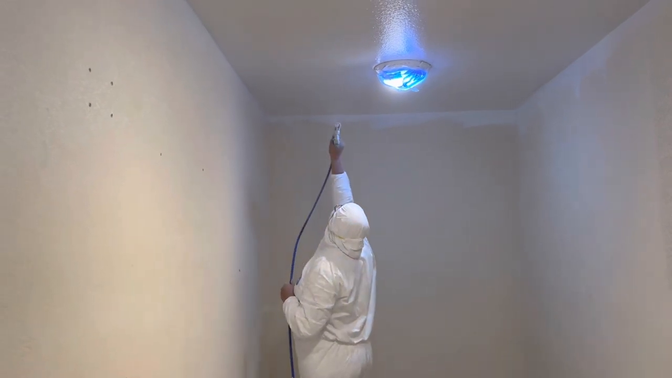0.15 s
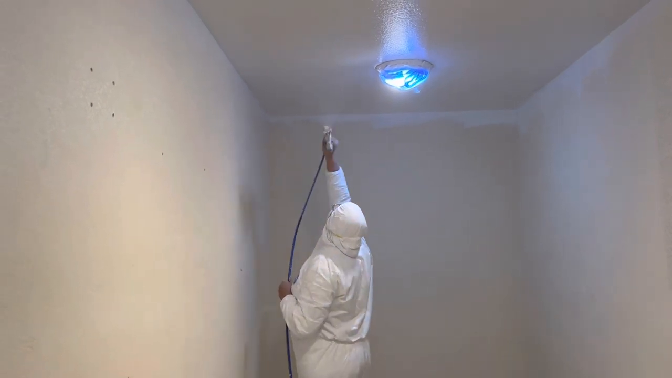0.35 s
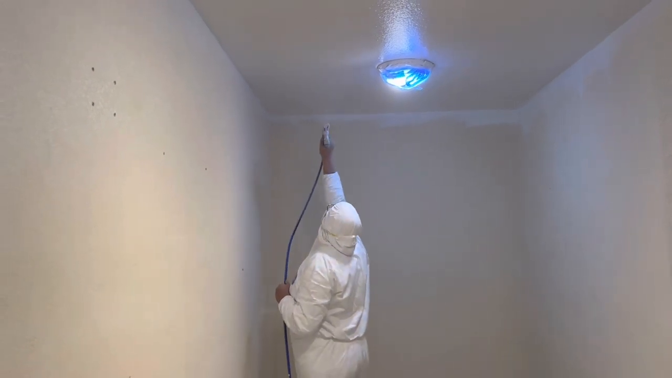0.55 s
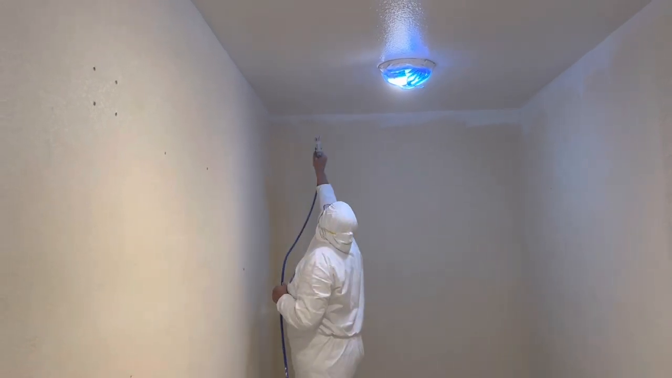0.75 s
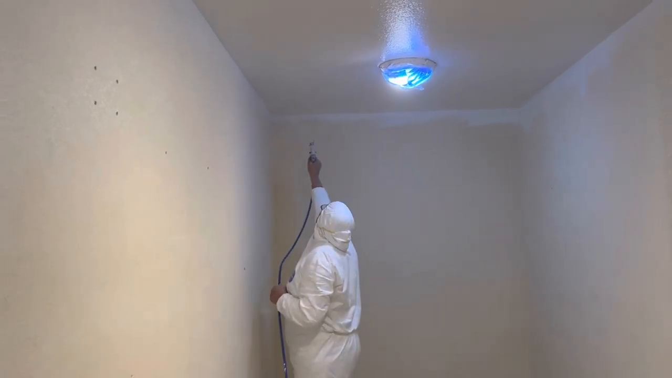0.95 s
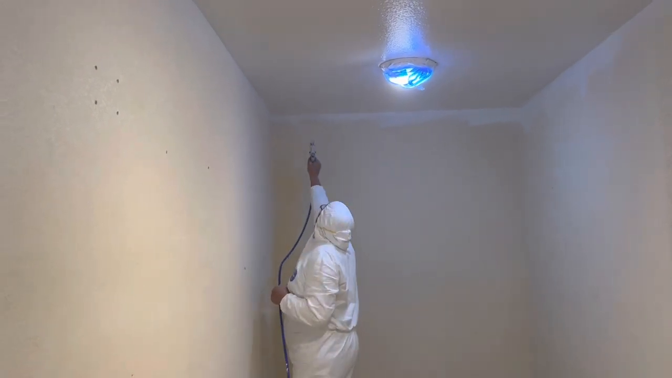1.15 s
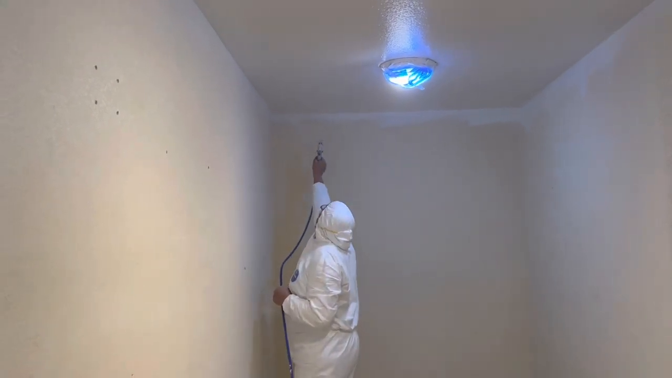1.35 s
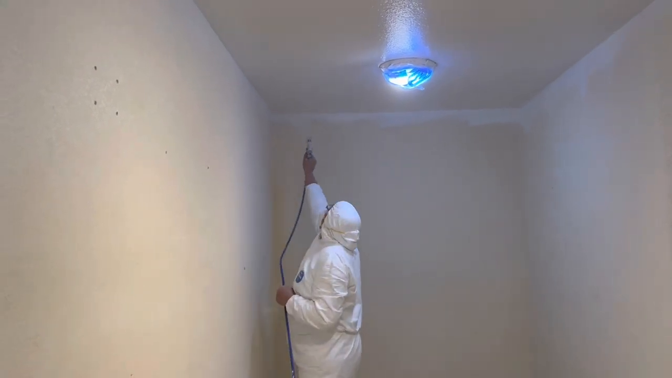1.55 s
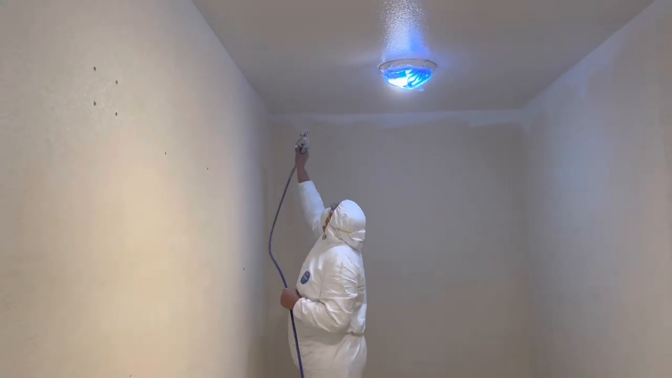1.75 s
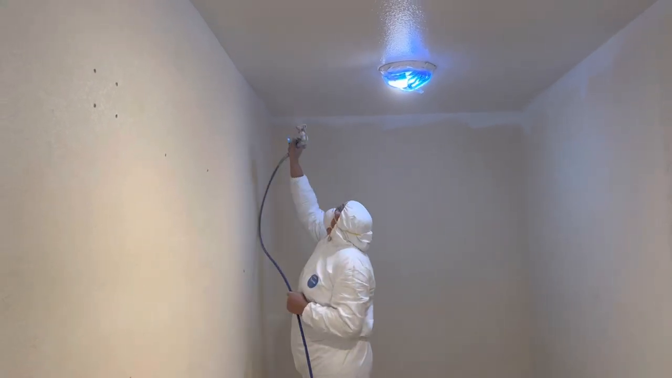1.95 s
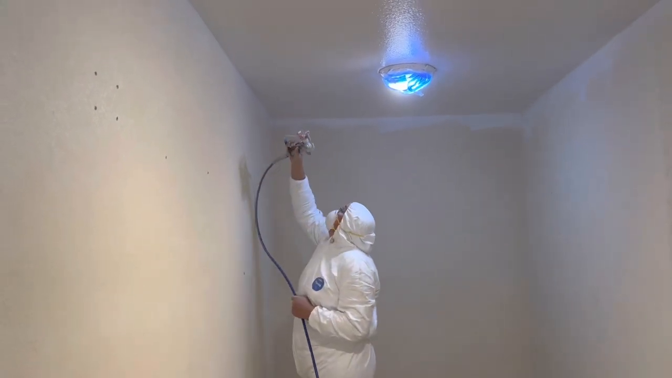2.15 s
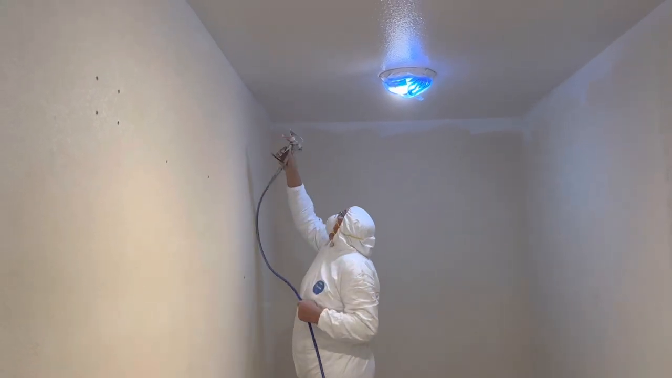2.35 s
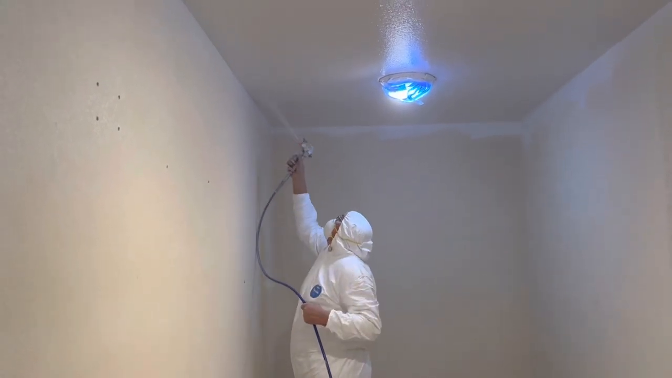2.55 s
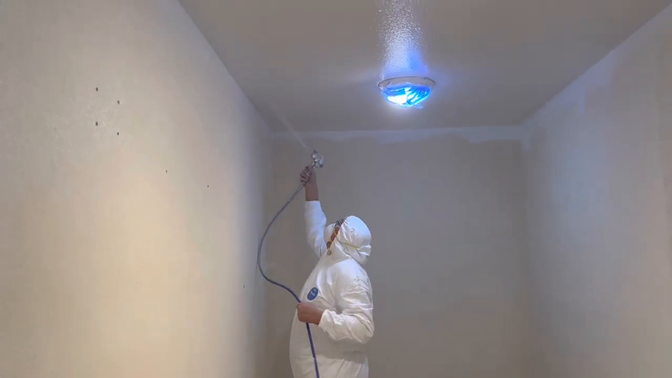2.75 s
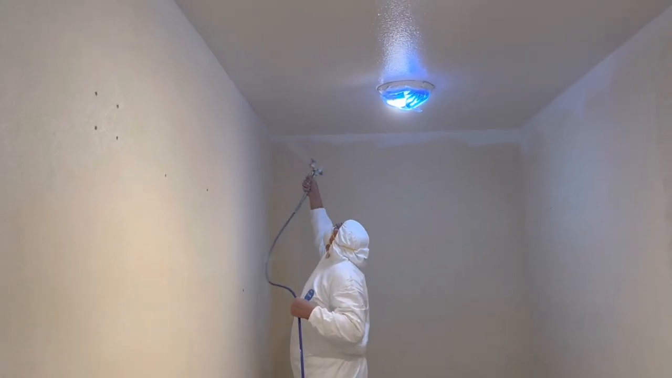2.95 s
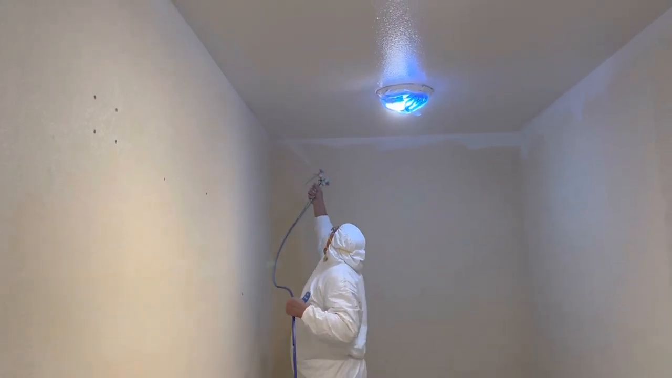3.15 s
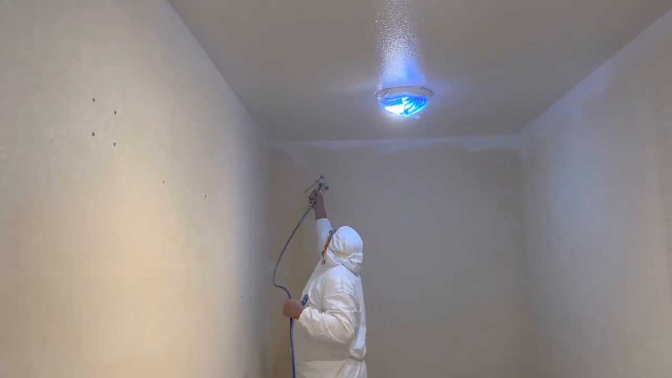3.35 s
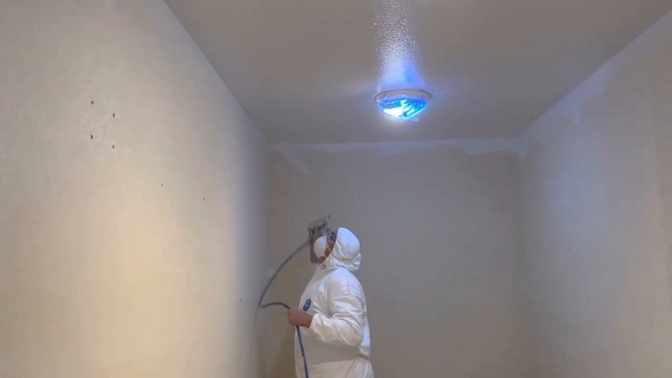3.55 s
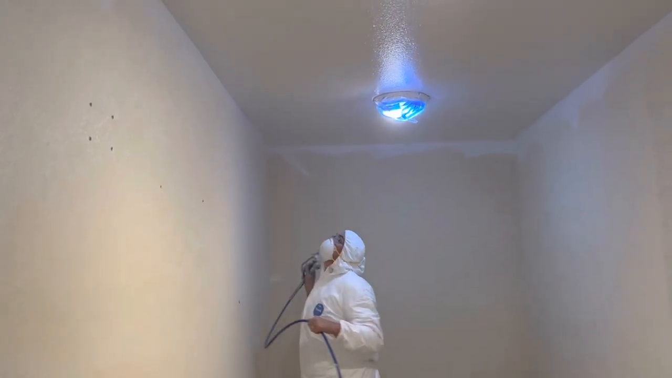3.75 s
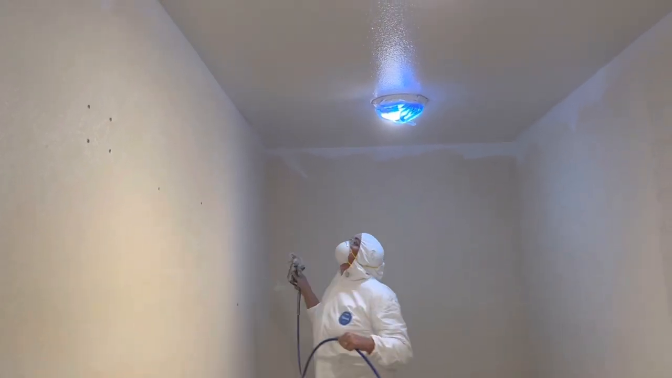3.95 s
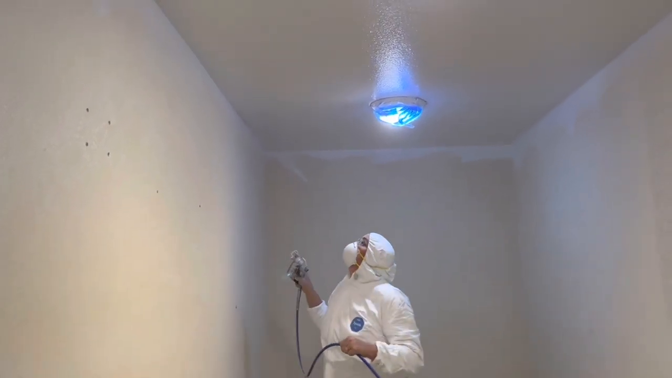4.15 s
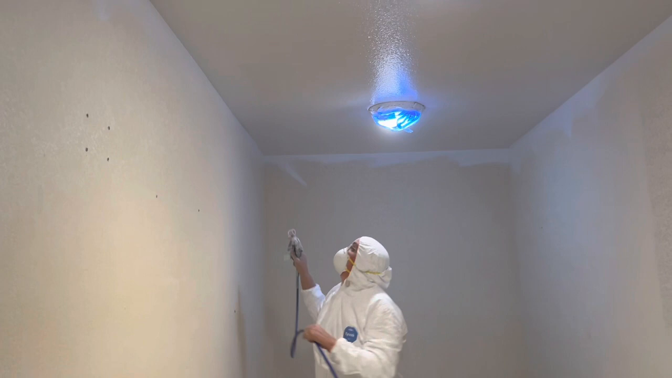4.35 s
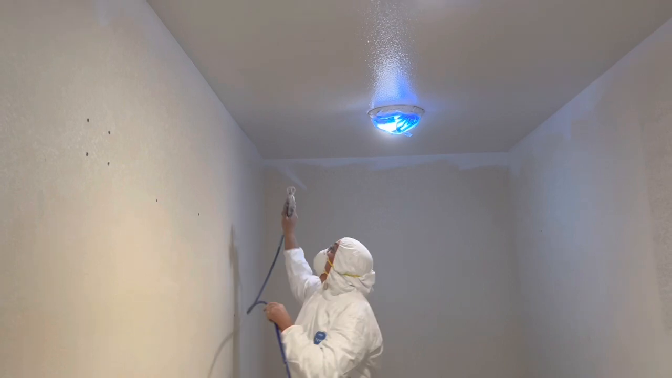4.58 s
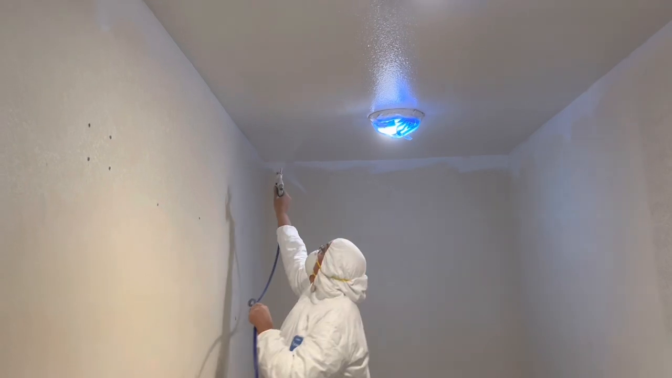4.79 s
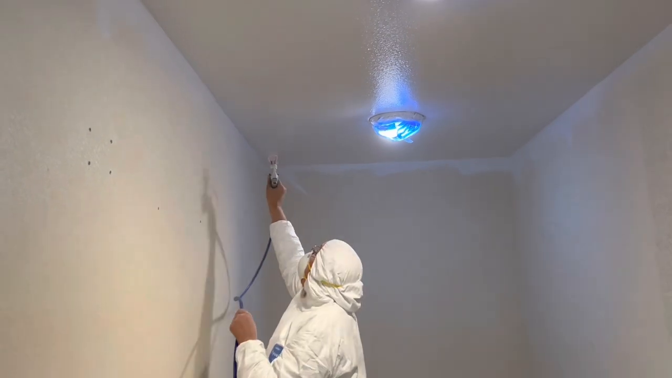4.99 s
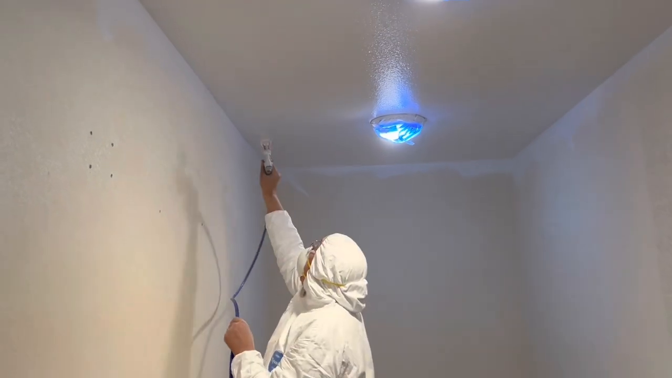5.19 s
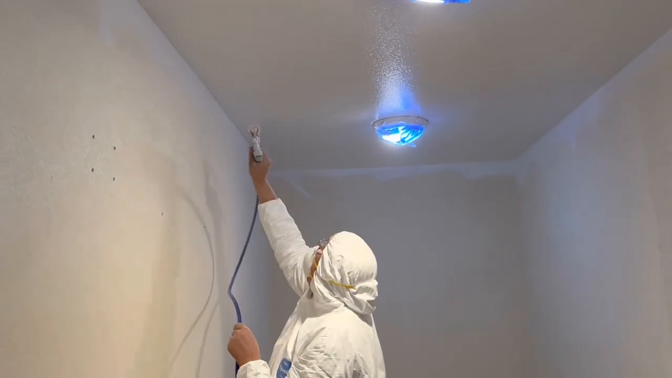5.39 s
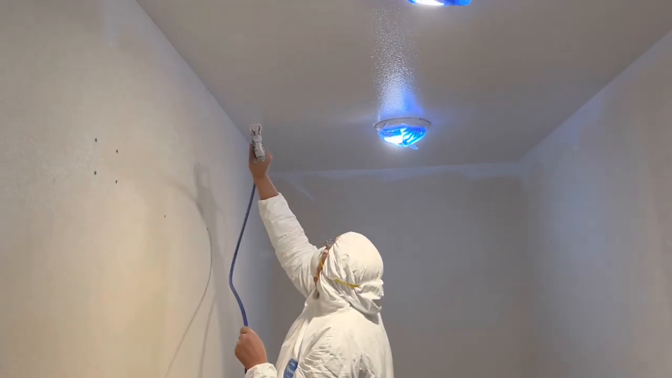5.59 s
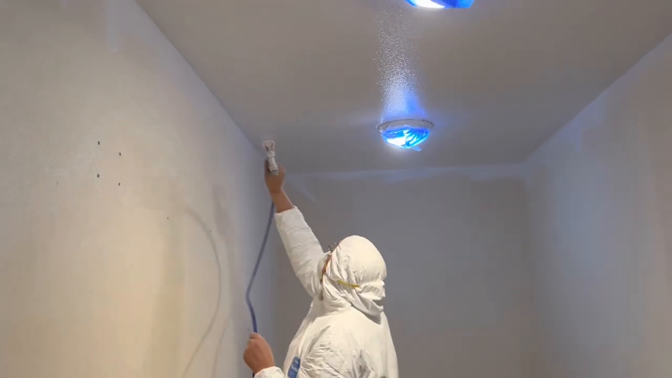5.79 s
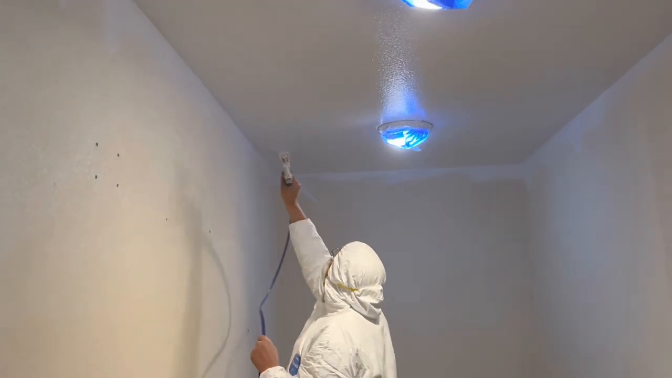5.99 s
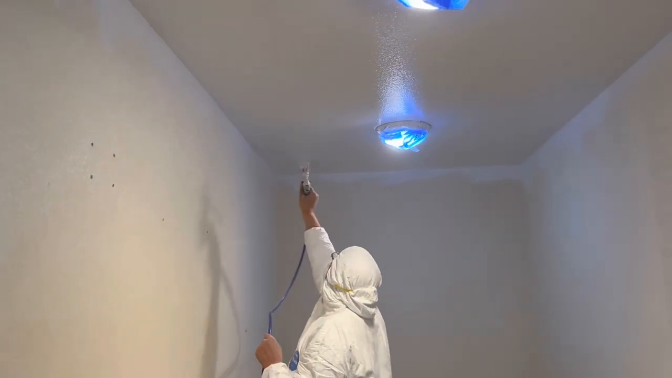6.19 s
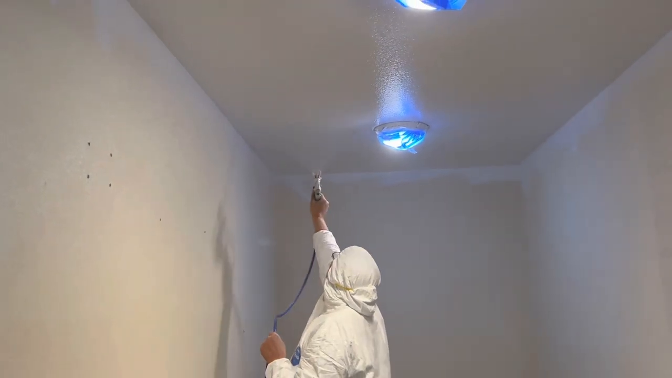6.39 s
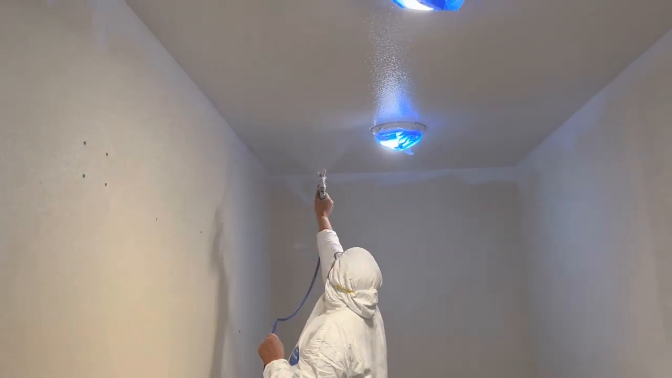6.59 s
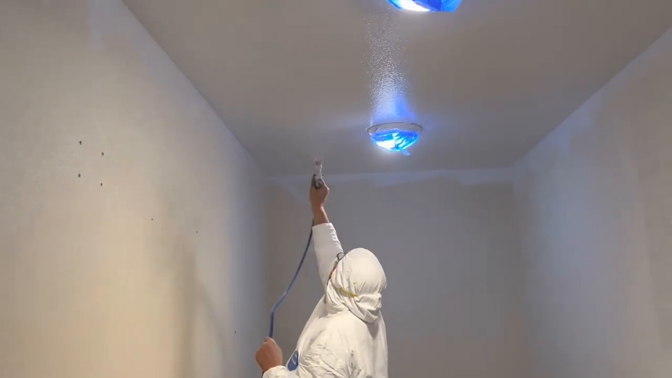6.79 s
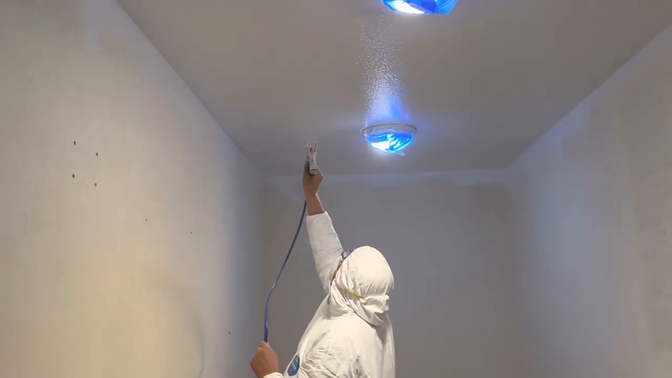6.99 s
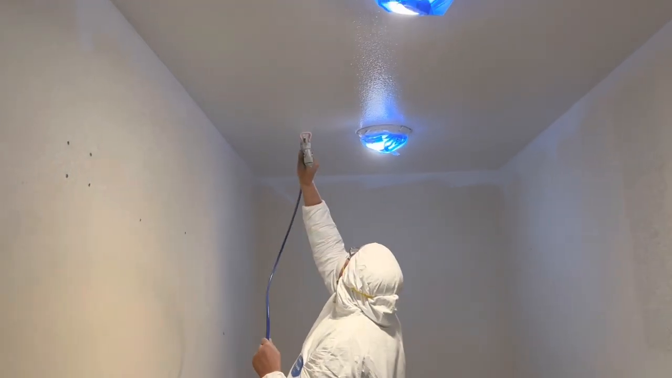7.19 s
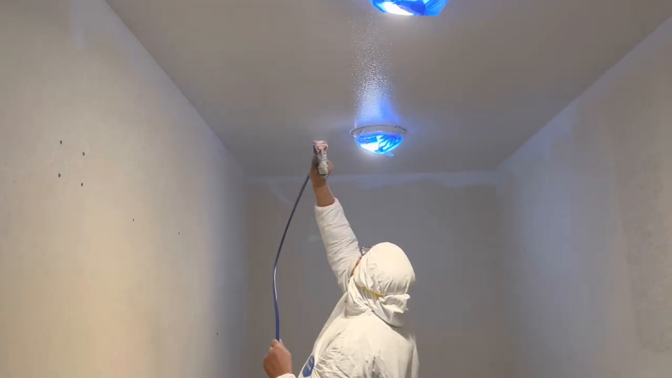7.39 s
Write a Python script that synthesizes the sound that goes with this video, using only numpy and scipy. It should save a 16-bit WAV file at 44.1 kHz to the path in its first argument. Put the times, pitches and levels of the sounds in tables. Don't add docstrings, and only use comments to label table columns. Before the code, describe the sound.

A paint sprayer hisses bright and tearing in a bare echoing room, cutting out twice while its distant pump motor growls, coasts down and restarts.

```python
import sys
import numpy as np
from scipy import signal
from scipy.fft import rfft, irfft, next_fast_len
from scipy.io import wavfile
from scipy.ndimage import uniform_filter1d

SR = 44100
rng = np.random.default_rng(int(sys.argv[2]) if len(sys.argv) > 2 else 0)


def to_linear_factor(level_db):
    exponent = np.asarray(level_db, float) / 20
    return 10 ** exponent


def log_audio(samples):
    frames = np.atleast_2d(samples).T
    limited = np.clip(frames, -1, 1)
    pcm = np.round(limited * 32767).astype(np.int16)
    wavfile.write(sys.argv[1], SR, pcm)


N = 327663
SIZE = next_fast_len(N + SR * 2)
HZ = np.maximum(np.fft.rfftfreq(SIZE, 1 / SR), 1)
TIME = np.arange(N) / SR

# time_s, shaft_hz, level_db
MOTOR_RUNS = [
    [(0.0, 36.78, -26), (0.25, 39.16, -28), (0.79, 40.1, -28), (1.11, 35.67, -26.5), (1.46, 35.56, -27),
     (1.98, 35.99, -26.5), (2.19, 37.1, -28.5), (2.43, 31.21, -29), (2.6, 29, -46)],
    [(2.828, 31.97, -31.5), (2.97, 35.32, -26.5), (3.1, 39.1, -29.5), (3.23, 42.17, -28),
     (3.45, 42.23, -28.5), (3.63, 39.7, -30.5), (3.774, 35.17, -33), (3.9, 32.65, -45.5), (4.0, 31.02, -52)],
    [(5.08, 31.12, -34.5), (5.16, 32.96, -27), (5.42, 41.5, -26), (5.56, 42.63, -26), (5.82, 41.23, -26),
     (6.12, 35.7, -29.5)],
    [(6.13, 35.83, -26), (6.33, 36.7, -25.5), (6.52, 32.12, -26), (6.68, 31.95, -26), (6.9, 34.99, -26.5),
     (7.14, 32.63, -26.5), (7.43, 34.06, -25)],
]
GEAR_TEETH = [7, 9, 10, 11, 12, 15, 22]
# pull_s, release_s, jet_db, shut_drop_db, dribble_end_s
TRIGGER = [
    (-.5, 2.08, -31.5, -10.5, 2.44),
    (2.531, 3.364, -31.5, -6.5, 3.75),
    (4.722, 7.6, -30.5, -6, 7.9),
]
SETTLED_HZ_PER_S = 2.9


def rms_one(x):
    return x / np.sqrt(np.mean(x ** 2) + 1e-20)


def column(tables, index):
    rows = np.vstack(tables)
    return np.interp(TIME, rows[:, 0], rows[:, index])


def at_hz(points, hz):
    points = np.array(points)
    return np.interp(np.log(hz), np.log(points[:, 0]), points[:, 1])


def shape(x, response):
    return irfft(rfft(x, SIZE) * response, SIZE)[..., :N]


def bandpass(x, low_hz, high_hz):
    return signal.sosfilt(signal.butter(2, [low_hz, high_hz], "band", fs=SR, output="sos"), x)


def drift(rate):
    r = np.exp(-80 * np.pi * rate / SR)
    slow = signal.lfilter([1], [1, -2 * r, r * r], rng.standard_normal(N // 40 + 2002))[2000:]
    return np.interp(np.arange(N) / 40, np.arange(len(slow)), rms_one(slow))


def gate(tables, open_s, close_s):
    total = 0
    for table in tables:
        opening = (TIME - table[0][0]) / open_s + 1
        closing = (table[-1][0] - TIME) / close_s + 1
        total = total + np.clip(np.minimum(opening, closing), 0, 1)
    return np.minimum(total, 1)


def swell(start, length, rise_s, fade_db_per_s):
    rise = np.clip((TIME - start) / rise_s + 1, 0, 1)
    return rise * to_linear_factor(-fade_db_per_s * np.maximum(TIME - start - length, 0))


def octave_part(hz, centre, sharpness):
    return np.clip(1 - sharpness * np.abs(np.log2(np.clip(hz, 125, 16000) / centre)), 0, 1)


def patchy(x, patchy_db, rate):
    out, together = 0, drift(rate / 4)
    for centre in 125 * 2. ** np.arange(8):
        flicker_db = patchy_db * (0.067 * together + drift(rate))
        out = out + shape(x, octave_part(HZ, centre, 1)) * to_linear_factor(flicker_db)
    return out


def direct():
    left_lag_s = 8.7 / SR
    return np.array([np.exp(-2j * np.pi * HZ * left_lag_s), np.ones_like(HZ)])


def far_noise():
    # pitch_hz, left_right_likeness
    likeness = [(60, 1), (180, 0.7), (400, 0.76), (900, 0.2), (3000, 0.055), (9000, 0.15), (11500, 0.7),
                (12300, 0.92), (16000, .99)]
    alike = np.clip(at_hz(likeness, HZ), 0, 1)
    shared, *own = rng.standard_normal((3, N))
    return shape(shared, direct() * np.sqrt(alike)) + shape(np.array(own), np.sqrt(1 - alike))


def room_echo():
    # pitch_hz, decay_s
    decay_times = [(200, 2.06), (2000, 0.74), (8000, 0.75), (12000, 0.27), (15000, 0.76)]
    t = np.arange(SR * 2) / SR
    white = rfft(rng.standard_normal((2, SR * 2)))
    hz = np.maximum(np.fft.rfftfreq(SR * 2, 1 / SR), 1)
    tail = 0
    for centre in 125 * 2 ** np.arange(0, 7.5, .5):
        decay_s = max(at_hz(decay_times, centre), .05)
        fall = to_linear_factor(-60 * t / decay_s) * np.minimum(t / 0.0034, 1)
        tail = tail + irfft(white * octave_part(hz, centre, 2)) * fall / np.sqrt(np.sum(fall ** 2))
    return rfft(tail, SIZE)


def in_room(x, echo):
    # pitch_hz, level_db
    echo_share = [(200, -9), (3000, 9), (8000, 12.5), (11000, -6.5), (12500, 5.5), (15000, -20)]
    share = to_linear_factor(at_hz(echo_share, HZ))
    return shape(x, (direct() + share * echo) / np.sqrt(1 + share ** 2))


def air():
    # pitch_hz, density_db_per_hz
    air_colour = [(21, -52), (35, -9), (86, -0.5), (133, 0.5), (167, 3), (205, -15.5), (334, -8.5),
                  (410, -12), (557, -12.5), (2110, -24), (10600, -39), (12700, -38), (13700, -43),
                  (16000, -45)]
    spectrum_db = at_hz(air_colour, HZ) + 8.5 * (HZ > 13700)
    return to_linear_factor(-44.5) * rms_one(shape(far_noise(), to_linear_factor(spectrum_db)))


def hum():
    # shaft_multiple, level_db
    hum_tones = [(2, -56.5), (3, -51), (4, -50), (5, -56.5), (6, -59.5), (7, -49.5), (14, -56)]
    shaft_hz, waver_db = 24.15, 2.9
    out = 0
    for multiple, db in hum_tones:
        tone = np.sin(2 * np.pi * (multiple * shaft_hz * TIME + rng.random()))
        out = out + to_linear_factor(db + waver_db * drift(0.93)) * tone
    return out


def speed():
    inertia_s = 0.07
    return uniform_filter1d(column(MOTOR_RUNS, index=1), int(inertia_s * SR), mode="nearest")


def steadiness(hz_per_s):
    return 1 / (1 + (np.gradient(speed()) * SR / hz_per_s) ** 4)


def colour(base_db, db_per_hz, coast_db_per_hz, start_db):
    usual_hz, start_s = 36, 0.15
    faster = speed() - usual_hz
    coasting, starting = 0, 0
    for pull, release, *_ in TRIGGER:
        coasting = coasting + np.clip((TIME - release) / 0.41, 0, 1) * (TIME < release + 1)
    for run in MOTOR_RUNS[1:3]:
        since = TIME - run[0][0]
        starting = starting + (since > -.1) * np.exp(-np.maximum(since, 0) / start_s)
    coast_db = coast_db_per_hz * coasting * np.minimum(faster - 2.5, 0)
    return to_linear_factor(base_db + db_per_hz * faster + coast_db + start_db * starting)


def gear_tones(turns):
    # between_rings_db, on_ring_db
    gear_levels = [(-24, -3.5), (-19.5, -8), (-18.5, 1), (-22, -5.5), (-20.5, -5.5), (-22.5, -4),
                   (-42, 0.5)]
    # pitch_hz, width_hz, level_db
    gear_rings = [(275, 10.4, -13), (376.4, 15.8, -9.5), (474.2, 10, -8), (536.5, 13.37, -8.5),
                  (633.4, 18, -10), (800.7, 6.6, -8), (927, 27, -6.5)]
    blur_hz_per_s = 38
    strike_db_per_hz = 0.6
    out, shaft, pitches = 0, speed(), np.arange(200., 1100)
    rings = sum(to_linear_factor(db) / (1 + (2 * (pitches - hz) / width) ** 4) for hz, width, db in gear_rings)
    for teeth, (off_db, on_db) in zip(GEAR_TEETH, gear_levels):
        lift = to_linear_factor(off_db) + to_linear_factor(on_db) * np.interp(teeth * shaft, pitches, rings)
        out = out + lift * np.sin(2 * np.pi * (teeth * turns + rng.random()))
    level_db = column(MOTOR_RUNS, index=2) + 3 + strike_db_per_hz * (shaft - 38)
    return shape(out * steadiness(blur_hz_per_s) * to_linear_factor(level_db), direct())


def shaft_contacts(turns):
    multiples_db = [0.5, 0, 3, 1.5, 7.5, 4.5, 4, 4.5, -1.5, 5.5, 0, -4, -1, -1.5, -3.5, 0.5, -1, -3, -0.5,
                    -3, -2, -2, -6, 2.5, -1.5, -6.5]
    orders = to_linear_factor(rng.normal(0, 1.55, 257)) * np.exp(2j * np.pi * rng.random(257))
    orders[140:] = 0
    orders[6:32] *= to_linear_factor(np.array(multiples_db))
    orders[GEAR_TEETH] = 0
    pattern = rms_one(irfft(orders, 4096))
    return np.interp(turns % 1 * 4096, np.arange(4096), pattern, period=4096)


def pump(echo):
    # pitch_hz, level_db
    bearing = [(200, -3), (700, -6), (1500, 1), (5000, 4)]
    # pitch_hz, density_db_per_hz
    housing = [(59, -38), (100, -8), (230, -18.5), (309, -5.5), (774, -4), (942, -3), (1070, -7),
               (1460, -3), (1700, -8.5), (2030, -7.5), (5000, -25.5), (6500, -23), (11000, -120)]
    # pitch_hz, width_hz, boost_db
    resonances = [(271, 6.4, 10), (372.3, 23, 11.5), (490, 8.9, 0), (542, 8.2, 11.5), (636, 8.7, 12),
                  (799.7, 6.6, 13.5), (927, 43, 8), (1004, 30, 8.5), (1173.6, 15, 11), (1505, 24, 4.5),
                  (2030, 10.6, 11.5), (2303, 6.9, 13), (2700, 360, 3.5), (3314, 510, 4)]
    turns = np.cumsum(speed() * (1 + 0.000615 * drift(6.2))) / SR
    settled = steadiness(SETTLED_HZ_PER_S)
    tone = np.clip(0.71 + 0.065 * settled, 0, 1)
    grind = rms_one(shape(far_noise(), to_linear_factor(at_hz(bearing, HZ)) * (HZ < 5500)))
    contacts = shape(shaft_contacts(turns), 0.54 * direct() + 0.65 * echo * np.clip(HZ / 400, 0, 1))
    heard = tone * contacts + np.sqrt(1 - tone ** 2) * grind

    rings = 1 + sum((to_linear_factor(db) - 1) / (1 + (2 * (HZ - hz) / width) ** 2) for hz, width, db in resonances)
    body = rms_one(shape(heard, to_linear_factor(at_hz(housing, HZ)) * rings * (HZ > 90) * (HZ < 6000)))
    bright = shape(body, np.clip(HZ / 3000, 0, 1))
    growl = shape(body, 1 / (1 + (HZ / 650) ** 4))
    bright_gain = colour(0.5, db_per_hz=0.6949, coast_db_per_hz=0.63, start_db=0)
    growl_gain = colour(-1.5 - 3 * settled, db_per_hz=0.55, coast_db_per_hz=0.9, start_db=-2)
    body = body + (bright_gain - 1) * bright + (growl_gain - 1) * growl
    body = patchy(body, patchy_db=.7, rate=10) * to_linear_factor(column(MOTOR_RUNS, index=2) + 3)
    return (body + gear_tones(turns)) * gate(MOTOR_RUNS, open_s=0.015, close_s=0.19)


def whine():
    # start_s, length_s, level_db
    songs = [
        (2.197, .08, -40),
        (2.39, 0.083, -53),
        (3.614, 0.056, -42),
        (3.76, 0.09, -39.5),
    ]
    pitch_hz = 960 + 5.3 * drift(15)
    tone = np.sin(2 * np.pi * np.cumsum(pitch_hz) / SR) * to_linear_factor(3 + 2.5 * drift(15))
    return tone * sum(to_linear_factor(db) * swell(s, length, rise_s=.04, fade_db_per_s=250) for s, length, db in songs)


def suit():
    # start_s, length_s, crisp_db, dull_db
    rustles = [
        (4.043, .01, -50, -53),
        (4.227, 0.11, -47.5, -55),
        (4.355, 0.011, -40.5, -36),
        (4.508, .005, -51, -52),
        (4.536, 0.013, -42, -44.5),
    ]
    grains = rng.standard_normal(N) * to_linear_factor(1.5 * rng.exponential(1, N) + 2.5 * drift(40))
    crisp = rms_one(bandpass(grains, 3500, 11000))
    dull = rms_one(bandpass(grains, 1000, 3800))
    out = 0
    for s, length, crisp_db, dull_db in rustles:
        out = out + to_linear_factor(crisp_db) * swell(s, length, rise_s=0.04, fade_db_per_s=200) * crisp
        out = out + to_linear_factor(dull_db) * swell(s, length, rise_s=0.04, fade_db_per_s=202) * dull
    return out


def knocks():
    # start_s, peak_db, pitch_hz, push_db, slosh_db
    hits = [
        (2.524, -33, 433, 0, 5.5),
        (2.709, -39, 294, -2, 7),
        (3.478, -25, 390.4, -3, 2.5),
        (4.722, -24.5, 590, -1, 2),
    ]
    slosh = rms_one(bandpass(rng.standard_normal(N), 140, 800))
    out = np.zeros(N)
    for s, db, hz, push_db, slosh_db in hits:
        t = np.maximum(TIME - s, 0)
        rise = 1 - np.exp(-t / 0.00081)
        ring = np.sin(2 * np.pi * hz * t) + 0.73 * np.sin(1.06 * np.pi * hz * t)
        push = np.sin(2 * np.pi * 140 * t) * (1 - np.exp(-t / 0.02))
        out += to_linear_factor(db + 5 - 60 * t / 0.037) * ring * rise
        out += to_linear_factor(db + push_db - 60 * t / 0.11) * push
        out += to_linear_factor(db + slosh_db - 10.5 - 60 * t / 0.49) * slosh * rise
    return out


def valve():
    # time_s, level_db
    pressure = [
        (0, 1.5),
        (.58, -0.2),
        (2.08, -1.1),
        (4.95, -1.7),
        (5.33, 1),
        (6.6, -1.2),
        (7.43, -0.3),
    ]
    shut_s, dribble_db_per_s = 0.074, 36
    burst_db_per_s, spurt_s = 4.5, 0.063
    top_late_s = 0.008
    flow, top_db = 0, 0
    for (pull, release, db, drop_db, end), before in zip(TRIGGER, TRIGGER[:1] + TRIGGER):
        held, after = np.maximum(TIME - pull, 0), np.maximum(TIME - release, 0)
        shut = np.minimum(after / shut_s, 1)
        spurt_db = burst_db_per_s * max(pull - before[1], 0) * np.exp(-held / spurt_s)
        level_db = db + spurt_db + drop_db * shut - dribble_db_per_s * after
        now = gate([[(pull,), (end,)]], open_s=0.004, close_s=0.069)
        flow = flow + now * to_linear_factor(level_db + column([pressure], index=1))
        sag_db = 0.68 * np.minimum(level_db + 47, 0)
        late_db = -25 * np.exp(-held / top_late_s)
        top_db = top_db + (now > 0) * (sag_db - 14 * shut + late_db - 0.7)
    return flow, top_db


def jet():
    # pitch_hz, density_db_per_hz
    jet_colour = [(150, -18), (500, -26), (1500, -12.5), (3500, -14), (5500, -8.5), (8500, 0.5),
                  (11000, -2), (12700, -3.5), (13800, -0.5), (15000, 6.5), (15700, -0.5), (16300, -48.5)]
    hiss = shape(rng.standard_normal(N), to_linear_factor(at_hz(jet_colour, HZ)))
    top = shape(hiss, HZ > 12000)
    flow, top_db = valve()
    hiss = (hiss + (to_linear_factor(top_db) - 1) * top) / np.std(hiss)
    return patchy(hiss, patchy_db=1.65, rate=17) * flow * to_linear_factor(9.0)


def scene():
    echo = room_echo()
    background = hum() + air()
    motor = pump(echo)
    cloth = suit()
    near = to_linear_factor(-10) * cloth + whine()
    gun = jet() + knocks()
    return in_room(gun + to_linear_factor(-2) * cloth, echo) + motor + shape(near, direct()) + background


def roll_off(x):
    return signal.sosfilt(signal.butter(12, 16950, fs=SR, output="sos"), x)


def record(dry):
    # pitch_hz, left_minus_right_db
    pair_lean = [(60, 0), (150, -0.5), (380, -4), (950, -4.5), (2380, -1), (5980, 5), (15000, -1.5)]
    lean = to_linear_factor(at_hz(pair_lean, HZ) * np.array([[.5], [-.5]]))
    top_cut = 1 / (1 + (HZ / 15850) ** 300)
    bass_cut = signal.butter(4, 42, "high", fs=SR, output="sos")
    mix = signal.sosfilt(bass_cut, shape(dry, lean * top_cut))
    return roll_off(mix)


dry = scene()
out = record(dry)
log_audio(out)
```